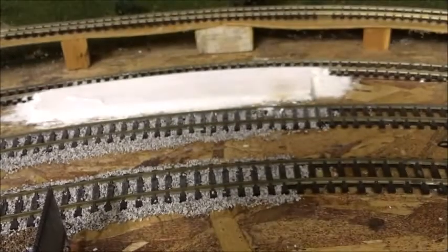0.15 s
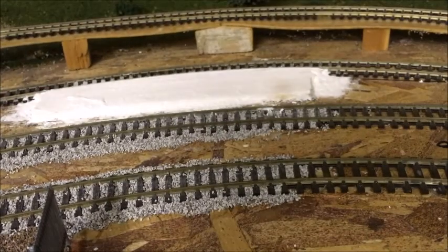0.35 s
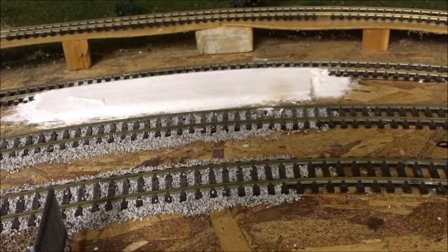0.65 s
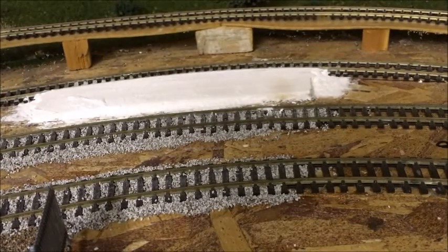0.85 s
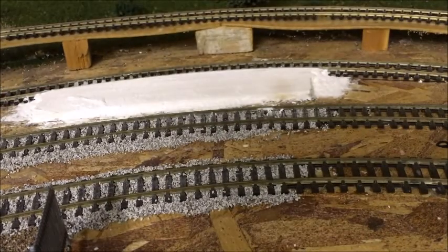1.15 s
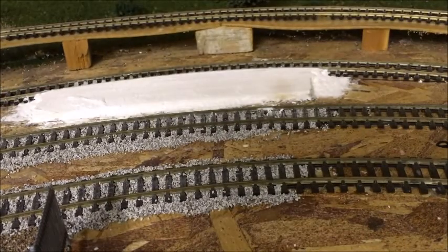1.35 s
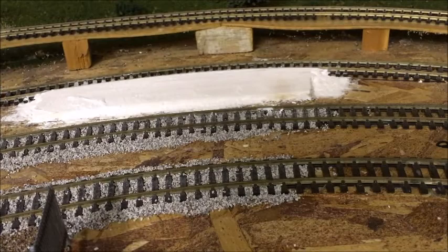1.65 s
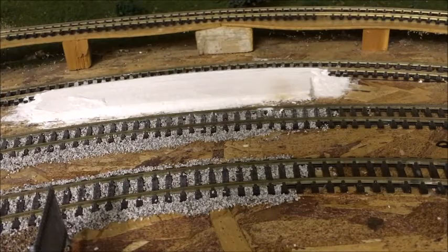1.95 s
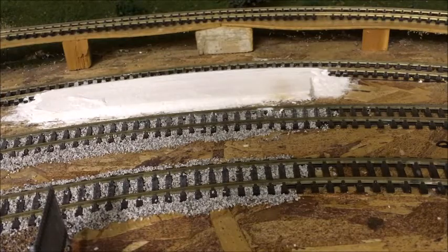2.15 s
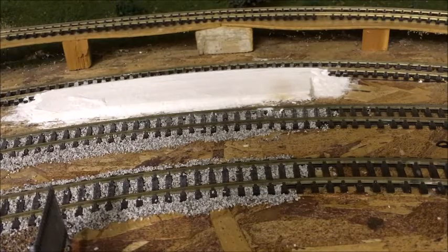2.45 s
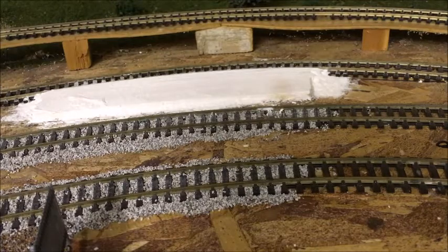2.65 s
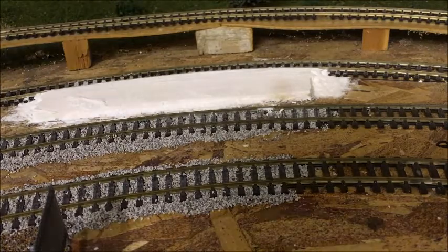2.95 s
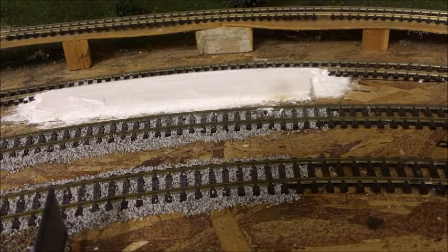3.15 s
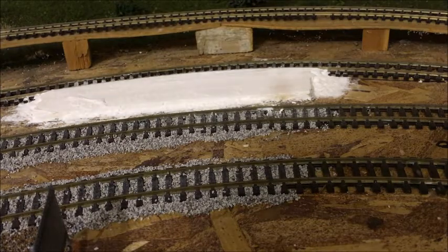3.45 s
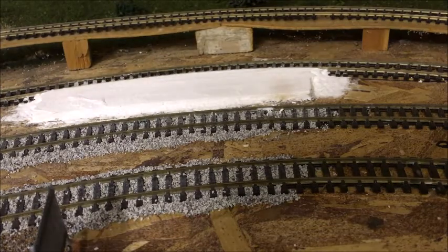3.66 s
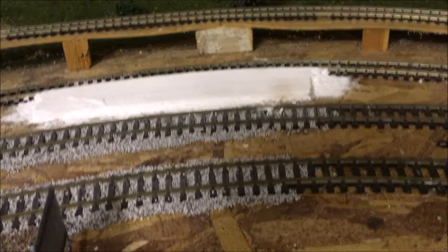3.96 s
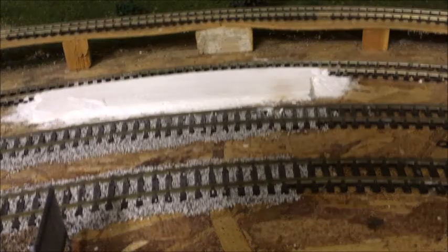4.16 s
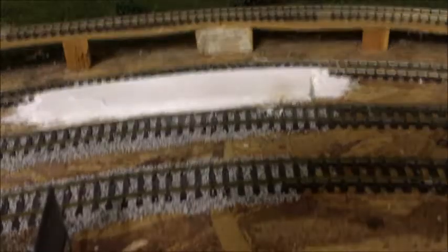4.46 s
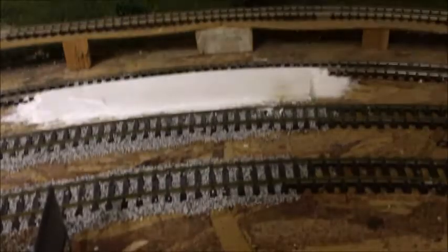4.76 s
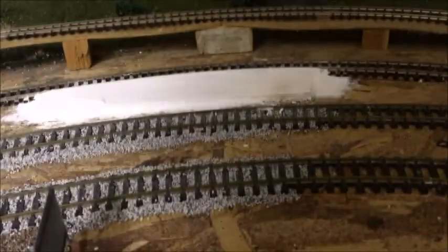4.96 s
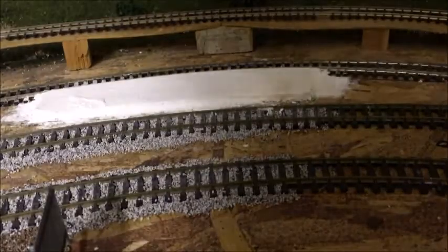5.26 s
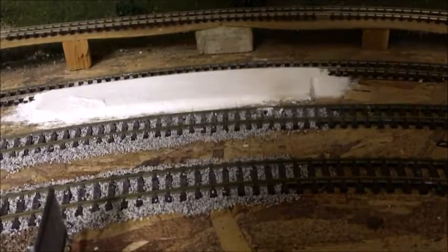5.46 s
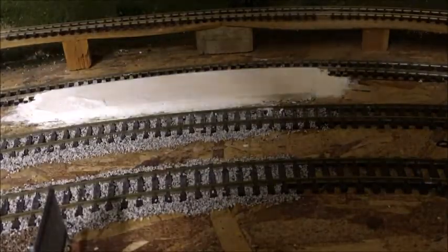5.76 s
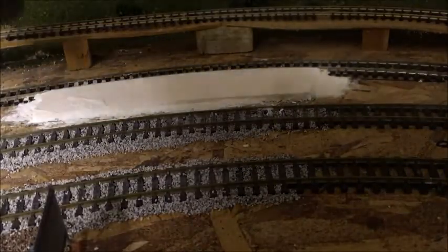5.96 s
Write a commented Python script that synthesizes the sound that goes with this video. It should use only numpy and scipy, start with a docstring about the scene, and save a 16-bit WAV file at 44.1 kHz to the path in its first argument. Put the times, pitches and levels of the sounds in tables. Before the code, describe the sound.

In a quiet indoor hobby room with a low hum, hands make soft papery scuffs, small rasps and dull thumps on a wooden table. After more than two seconds a switch clicks and a vacuum cleaner spins up quickly, its whine rising into a steady roar with bright hiss. Low jolts shake the table, which groans once, rising in pitch. The microphone is close, dry and centred.

```python
"""A hobby room with a wooden table: quiet handling, then a vacuum cleaner, both channels alike.
Grains of noise make the scuffs of paper and cloth; low noise and dying rings make the dull bumps.
The cleaner clicks on and spins up: tones locked to its shaft rise over a roar of shaped noise.
Once the table groans under the hose, as tones at a rising stick-slip rate.
Now and then the sound thins out for a moment, when only its strongest frequencies pass."""
import sys
import numpy as np
from scipy import signal
from scipy.fft import rfft, irfft
from scipy.io import wavfile
from scipy.ndimage import uniform_filter1d, map_coordinates

SR = 44100
rng = np.random.default_rng(int(sys.argv[2]) if len(sys.argv) > 2 else 0)


def unload_wav(signal):
    """Save mono or channel-first audio to the path in sys.argv[1] as 16-bit WAV at rate SR, clipped to [-1, 1]."""
    wavfile.write(
        sys.argv[1],
        SR,
        np.round(np.clip(np.atleast_2d(signal).T, -1, 1) * 32767).astype(np.int16),
    )


def amplitude_ratio(level_db):
    """Convert a level in decibels to the matching linear amplitude (field) ratio."""
    exponent = np.asarray(level_db, float) / 20
    return 10 ** exponent


N = 269892
T = np.arange(N) / SR
SWITCH_S = 2.41  # the cleaner is switched on


def unit(x):
    """Scales x to rms 1."""
    return x / np.sqrt(np.mean(x ** 2) + 1e-20)


def evened(x, size):
    """Brings x to rms 1 over a running stretch of samples."""
    return x / np.sqrt(np.abs(uniform_filter1d(x ** 2, size=size)) + 1e-20)


def along(points, hz):
    """Reads a (f/Hz, level/dB) table along a log frequency axis."""
    f, level = np.transpose(points)
    return np.interp(np.log(hz + 1), np.log(f + 1), level)


def curves(rows):
    """Gives one value per sample for each column after the time."""
    s, *columns = np.transpose(rows)
    return [np.interp(T, s, column) for column in columns]


def sounding(rows):
    """One while a table lasts, zero outside, with 10 ms edges."""
    return np.clip(np.minimum(T - rows[0][0], rows[-1][0] + .01 - T) / .01, 0, 1)


def wobble(rate):
    """A smooth random curve with rate random points a second."""
    return map_coordinates(rng.standard_normal(int(N * rate / SR) + 4), [T * rate])


def swell(s, db, width):
    """A bell-shaped rise and fall around the time s."""
    return amplitude_ratio(db) * np.exp(-.5 * ((T - s) / width) ** 2)


def grit(spread_db):
    """Dense grains of noise whose size varies at random."""
    return rng.standard_normal(N) * amplitude_ratio(spread_db * wobble(900))


def noise(gain, patchy_db, source=None, size=1024):
    """Noise with patches of random level, shaped by gain(Hz column, s row)."""
    source = rng.standard_normal(N) if source is None else source
    hz, s, z = signal.stft(source, SR, nperseg=size)
    field = uniform_filter1d(rng.standard_normal(z.shape), size=8, axis=0)
    field = uniform_filter1d(field, size=6, axis=1)
    shaped = z * amplitude_ratio(patchy_db * unit(field)) * gain(hz[:, None], s)
    return signal.istft(shaped, SR, nperseg=size)[1][:N]


def colored(points, patchy_db, source=None, size=1024):
    """Patchy noise with the fixed spectrum of a table."""
    return noise(lambda hz, s: amplitude_ratio(along(points, hz)), patchy_db, source, size)


def tone(hz):
    """A sine of rms 1 on a moving pitch: the phase adds up the frequency."""
    return np.sqrt(2) * np.sin(2 * np.pi * np.cumsum(hz * np.ones(N)) / SR + rng.uniform(0, 2 * np.pi))


# Spectrum of the steady floor: f/Hz, level/dB (relative)
FLOOR_SPECTRUM = [(15, -73), (25, -65), (43, -25), (59, 2.5), (80, -20), (113, -11), (148, -10.5),
                  (179, -14.5), (352, -28.5), (1640, -44), (2970, -64), (4950, -91), (15800, -38)]


def room():
    """The floor of the room and the microphone is steady, mostly low noise."""
    return amplitude_ratio(-54.5) * unit(colored(FLOOR_SPECTRUM, patchy_db=1.5, size=4096))


# What the heavy frame of the table passes on: f/Hz, level/dB (relative)
FRAME_SPECTRUM = [(20, -23), (35, 8), (50, -3), (85, 2.5), (115, 2), (160, -40.5)]
# What the lighter table top passes on: f/Hz, level/dB (relative)
TOP_SPECTRUM = [(90, -23), (130, 0.5), (185, 7.5), (230, -12), (310, -8), (400, -18), (600, -51)]
# How busy the hands are: t/s, frame level/dB, top level/dB
HAND_LEVELS = [(0, -52.5, -52), (.14, -46, -47.5), (.21, -38, -44.5), (.42, -50, -52), (.6, -52, -61),
               (.68, -47.5, -53), (.9, -57, -55.5), (1.04, -55, -68), (1.08, -50, -46), (1.36, -53, -51.5),
               (1.54, -54, -58), (1.69, -42.5, -48.5), (1.82, -57.5, -62), (2.1, -54.5, -54),
               (2.16, -55, -49.5), (2.41, -53, -54), (2.45, -47, -57)]
# Jolts of the table under the running motor: peak t/s, level/dB, width of the bell t/s
JOLTS = [(2.62, -51, .03), (2.78, -39, 0.055), (2.86, -48, .04), (3.89, -31, 0.022), (4.18, -40, 0.023),
         (4.28, -50, .04), (4.37, -30, 0.031), (4.92, -43, 0.053), (5.1, -39.5, 0.069), (5.28, -50, .1),
         (5.42, -41, 0.1), (5.79, -49, .04), (6.01, -47, 0.035)]


def bumps():
    """Hands and hose shake the frame and the top of the table, which pass on low lumps of noise."""
    frame = evened(colored(FRAME_SPECTRUM, patchy_db=-0.5, size=4096), size=3000)
    top = evened(colored(TOP_SPECTRUM, patchy_db=4.5, size=4096), size=2000)
    deep = noise(lambda hz, s: amplitude_ratio(along(FRAME_SPECTRUM, hz)) * (hz > 33), patchy_db=-1.5, size=4096)
    deep = evened(deep, size=4000)
    frame_db, top_db = curves(HAND_LEVELS)
    hands = amplitude_ratio(frame_db + 1.9 * wobble(13.84)) * frame
    hands += amplitude_ratio(top_db + 1.5 * wobble(14)) * top
    tremor = (T > SWITCH_S) * amplitude_ratio(-58 + 5.6 * wobble(6.8))  # unsteady shaking while the motor runs
    jolts = sum(swell(*row) for row in JOLTS)
    return sounding(HAND_LEVELS) * hands + (jolts + tremor) * deep


# Low thumps of a hand on the table: t/s, level/dB (before the soft onset), ring f/Hz, fall by 60 dB t/s
HAND_THUMPS = [(.19, -27, 80, 0.2), (0.241, -27.5, 75, 0.43), (1.075, -34, 87.4, 0.63),
               (1.595, -27, 229, 0.054), (1.674, -21.5, 172, 0.04), (2.132, -40.5, 190, 0.6)]


def thumps():
    """Each thump is one soft-edged ring that dies away exponentially."""
    out = np.zeros(N)
    for s, db, hz, t60 in HAND_THUMPS:
        t = np.clip(T - s, 0, None)
        onset = 1 - np.exp(-t / 0.0068)
        out += amplitude_ratio(db - 60 * t / t60) * np.sin(2 * np.pi * hz * t) * onset
    return out


# Strokes of paper and cloth: start t/s, length t/s, peak level/dB, sheen level/dB (relative to the rub)
RUB_STROKES = [(-.06, 0.3, -52.5, 1.5), (0.142, 0.22, -48.5, -7), (0.263, 0.13, -53.5, -9),
               (.34, 0.48, -64.5, -0.5), (0.606, 0.23, -58.5, -3.5), (0.78, 0.13, -55, -11),
               (.84, .2, -70, 0), (0.99, 0.083, -65, -20), (1.055, 0.082, -58.5, -14),
               (1.093, 0.25, -72.5, -13), (1.383, 0.11, -58.5, -1.5), (1.56, 0.089, -61, -23),
               (1.63, 0.14, -75, -1), (1.74, 0.091, -69, 8), (2.056, 0.094, -68.5, -19),
               (2.126, .26, -55.5, -7), (2.337, 0.24, -67, -3)]


def strokes():
    """Levels of the rub and its bright sheen: a stroke swells quickly and fades more slowly."""
    peak_at, sharpness = 0.41, 1.58  # share of the length before the peak; power of the sine swell
    rub = amplitude_ratio(-77.5 + 2.7 * wobble(5.86)) * (T < SWITCH_S)  # faint rustle between the strokes
    sheen = amplitude_ratio(-10) * rub
    for s, length, db, sheen_db in RUB_STROKES:
        progress = np.clip((T - s) / length, 0, 1) ** (np.log(.5) / np.log(peak_at))
        shape = amplitude_ratio(db) * np.abs(np.sin(np.pi * progress)) ** sharpness
        rub = rub + shape
        sheen = sheen + amplitude_ratio(sheen_db) * shape
    return rub, sheen


# Spectrum of the rubbing grains: f/Hz, level/dB (relative)
RUB_SPECTRUM = [(240, -3), (400, 1.5), (852, -5.5), (951, -2.5), (1630, -1.5), (1840, -6.5), (2580, -2),
                (4930, -15), (5500, -15), (7150, -29), (12100, -120)]
# Spectrum of the bright sheen on the strokes: f/Hz, level/dB (relative)
SHEEN_SPECTRUM = [(2650, -15), (4500, -1), (4990, -19), (5720, 2.5), (6210, -1), (7820, -6.5), (8890, -2.5),
                  (10400, -5.5), (15300, -2.5)]
# Resonances of the short knock: f/Hz, fall by 60 dB t/s, level/dB (relative)
KNOCK_RINGS = [(418, 0.15, -7.5), (1043, 0.15, -19), (250, 0.033, -11)]
# Short rasps, and last the click of the cleaner's switch:
# t/s, level/dB (scale), length t/s, knock level/dB and bright ping level/dB (both relative)
RASPS_AND_CLICK = [(0.289, -38, 0.012, 1, -30), (0.8197, -31, 0.012, -14.5, -5.5),
                   (1.404, -43, 0.025, 12, -30), (1.593, -67, 0.033, -3, -28), (2.416, -33, 0.039, 5, -35)]


def scuffing():
    """Strokes are rubbing grains; each rasp or click is a burst of grains with a short knock."""
    rub_gain, sheen_gain = strokes()
    rub = unit(colored(RUB_SPECTRUM, patchy_db=1.5, source=grit(spread_db=3.0)))
    sheen = unit(colored(SHEEN_SPECTRUM, patchy_db=1))
    out = rub_gain * rub + sheen_gain * sheen
    t = np.arange(SR // 5) / SR
    knock = sum(amplitude_ratio(db - 60 * t / t60) * np.sin(2 * np.pi * hz * t) for hz, t60, db in KNOCK_RINGS)
    flutter = 1 + 0.87 * np.sin(2 * np.pi * 170 * t)
    ping = amplitude_ratio(-60 * t / 0.036) * np.sin(2 * np.pi * 5270 * t) * flutter
    onset = 1 - np.exp(-t / 0.0032)
    for s, db, length, knock_db, ping_db in RASPS_AND_CLICK:
        u = np.clip(T - s, 0, None) / length
        out += amplitude_ratio(db) * rub * u * np.exp(-2 * u)
        ringing = amplitude_ratio(knock_db) * knock + amplitude_ratio(ping_db) * ping
        out[round(s * SR):][:len(t)] += amplitude_ratio(db) * ringing * onset
    return out


# Groan of the table: t/s, slip rate f/Hz, level/dB, octave level/dB
GROAN_PATH = [(4.22, 91.6, -62, -51), (4.26, 91.9, -19, -32), (4.3, 101.5, -30, -55),
              (4.37, 116.1, -26.5, -46), (4.42, 121.4, -30, -44), (4.49, 139.2, -20.5, -50),
              (4.56, 133.6, -25, -36), (4.6, 143.3, -39, -50), (4.67, 156, -39, -37), (4.75, 176, -58, -59)]


def groan():
    """Wood sticks and slips at a mostly rising, shaky rate; a panel of the table rings along."""
    rate_hz, level_db, octave_db = curves(GROAN_PATH)
    rate_hz = rate_hz + 3 * wobble(30)
    slips = amplitude_ratio(level_db + 1.3 * wobble(37)) * tone(rate_hz)
    slips += amplitude_ratio(octave_db) * tone(2 * rate_hz)
    panel = swell(4.52, -34 + 1.9 * wobble(30), 0.078) * tone(177 + 4 * wobble(13.0))
    return sounding(GROAN_PATH) * (slips + panel)


FULL_HZ = 417.9  # shaft at full speed, before it eases off


def spin_up():
    """The shaft gains speed with a quick kick, then approaches full speed exponentially."""
    kick_share, kick_s, slow_s = .16, .08, .295  # share of the quick gain; two time constants
    since = np.clip(T - SWITCH_S, 0, None)
    speed = 1 - kick_share * np.exp(-since / kick_s) - (1 - kick_share) * np.exp(-since / slow_s)
    sag_s = np.clip(T - 4.6, 0, None)
    shaft_hz = FULL_HZ * speed - 0.794 * sag_s  # late on, the pitch eases off a little
    lag = np.tanh(25 * np.clip(.993 - speed, 0, 1))  # near one while speed is gained, zero at the top
    opening = 1 - np.exp(-since / 0.0076)
    return since, speed, sag_s, shaft_hz, lag, opening


# How the room carries the shaft tone at each pitch: f/Hz, level/dB
SHAFT_CARRY = [(67, -62), (160, -49), (220, -31), (240, -40), (272, -26.5), (289, -42), (303, -33),
               (323, -44.5), (343, -32), (351, -42), (362, -32.5), (392, -28), (398, -29), (404, -27),
               (418, -25.5)]
# Shaft orders: multiple of the shaft, offset in hum multiples, full-speed level/dB,
# gain during the run-up level/dB, unsteadiness level/dB
SHAFT_ORDERS = [(2, 0, -45.5, -20, 1.5), (6, 0, -44, -6, 2.5), (12, 0, -51.5, 8.5, 2.5),
                (12, -2, -51, -25, 1.5)]
# Magnetic hum at twice the mains: t/s, level/dB
HUM_LEVELS = [(2.42, -56), (2.46, -31.5), (2.7, -33), (3.1, -37), (3.8, -42), (4.2, -37.5), (5, -42.5),
              (6.12, -39)]


def motor_tones():
    """The shaft sounds its turning rate and multiples of it; magnetic hum stays at one pitch."""
    hum_hz = 100
    whistle_hz, whistle_width_hz, whistle_db = 2430, 18, 10  # a cavity sings as an order sweeps through it
    since, speed, sag_s, shaft_hz, lag, opening = spin_up()
    shaft_db = along(SHAFT_CARRY, FULL_HZ * speed) - 1.4 * sag_s
    tones = amplitude_ratio(shaft_db + 0.56 * wobble(30)) * tone(shaft_hz + 1.11 * wobble(40))
    jitter_hz = (.25 + 9 * (1 - speed)) * wobble(90)
    for k, offset, db, early_db, shaky_db in SHAFT_ORDERS:
        sings_db = whistle_db * np.exp(-.5 * ((k * shaft_hz - whistle_hz) / whistle_width_hz) ** 2)
        level_db = db + early_db * lag + sings_db + shaky_db * wobble(18)
        tones += amplitude_ratio(level_db) * speed * tone(k * (shaft_hz + jitter_hz) + offset * hum_hz)
    tones += amplitude_ratio(curves(HUM_LEVELS)[0] + wobble(15)) * tone(hum_hz)
    return opening * tones


# Spectrum of the roaring air: f/Hz, level/dB (relative)
ROAR_SPECTRUM = [(280, -46), (480, -10), (559, -10.5), (652, -3.5), (816, -8.5), (885, -5.5), (1110, -1),
                 (1200, -11), (1370, -5), (1770, -3.5), (1920, -1), (2560, -4.5), (2640, -2.5),
                 (2890, -0.5), (5500, -12.5), (7150, -14.5), (12100, -120)]
# Spectrum of the brighter hiss: f/Hz, level/dB (relative)
HISS_SPECTRUM = [(2650, -16.5), (4500, -0.5), (5550, 2.5), (6030, 5.5), (6570, 3), (8150, -3.5), (9310, 1),
                 (11400, -6), (12600, -2.5), (15300, -4.5)]
# Spectrum of the rumble under the roar: f/Hz, level/dB (relative)
RUMBLE_SPECTRUM = [(100, -6.5), (150, -3), (250, -4), (350, -1.5), (470, 2.5), (560, -31)]
# Resonances of the cleaner's shell and hose: f/Hz, width f/Hz, level/dB (boost)
SHELL_RESONANCES = [(760, 36, 15), (1126, 40, 3), (1281, 270, 10.5), (1550, 23, 7.5), (2885, 27, 2.5),
                    (3337, 25, 17), (4320, 39, 12), (6340, 190, 2)]


def rushing_air():
    """Air roars and hisses through the shell and hose; the roar's upper edge climbs with the speed."""
    since, speed, sag_s, shaft_hz, lag, opening = spin_up()

    def shell(hz):
        return amplitude_ratio(sum(db / (1 + ((hz - c) / (w / 2)) ** 2) for c, w, db in SHELL_RESONANCES))

    def roar_shape(hz, s):
        shaft = np.interp(s, T, shaft_hz)
        distance = np.log((hz + 1) / (12 * shaft + 1)) / .09  # from the rate of 12 blades
        ridge = amplitude_ratio(6 * np.interp(s, T, lag) * np.exp(-.5 * distance ** 2))  # whoosh in the run-up
        edge_hz = 13 * shaft + 500
        return amplitude_ratio(along(ROAR_SPECTRUM, hz)) * shell(hz) * ridge / np.sqrt(1 + (hz / edge_hz) ** 8)

    def hiss_shape(hz, s):
        return amplitude_ratio(along(HISS_SPECTRUM, hz)) * shell(hz)

    roar = evened(noise(roar_shape, patchy_db=1.5, source=grit(spread_db=0.5)), size=8000)
    hiss = unit(noise(hiss_shape, patchy_db=0.5, source=grit(spread_db=-0.5)))
    rumble = unit(colored(RUMBLE_SPECTRUM, patchy_db=1.5, size=2048))
    roar_gain = amplitude_ratio(-28.5) * np.abs(speed) ** 1.49
    roar_gain += amplitude_ratio(-39) * opening * np.exp(-since / 0.1)  # first rush of air
    hiss_gain = amplitude_ratio(-33 + 0.25 * wobble(1.7)) * np.abs(speed) ** 2.28
    spit_s = 0.019  # short spit of hiss after the switch
    hiss_gain += amplitude_ratio(-38.5) * since / spit_s * np.exp(-since / spit_s)
    return roar_gain * (roar + amplitude_ratio(-12.5) * rumble) + hiss_gain * hiss


def vacuum():
    """The cleaner is its motor's tones together with the noise of the air it moves."""
    return motor_tones() + rushing_air()


def scene():
    """Adds all the sources and gives both channels the same sum."""
    mono = room() + bumps() + thumps() + scuffing() + groan() + vacuum()
    return np.array([mono, mono])


# Moments when the sound thins out: middle of the first block t/s, number of blocks
THIN_MOMENTS = [(.166, 1), (.487, 1), (.633, 1), (.679, 2), (.827, 1), (.871, 1), (1.107, 1), (1.659, 1),
                (1.851, 1), (1.915, 1), (2.705, 1), (3.112, 2), (3.238, 1), (3.301, 1), (3.345, 1),
                (3.473, 1), (3.537, 1), (3.814, 1), (3.986, 1), (4.217, 1), (4.666, 1), (4.712, 2),
                (4.815, 1), (4.859, 1), (5.753, 1), (5.818, 1), (5.861, 1), (5.924, 1)]


def thinned(x):
    """In 43 ms blocks the strongest frequencies above 500 Hz take over their neighbours' energy."""
    half = 941  # samples in half a block
    bar_db, leak_db = 5, -16  # bar over the local level at 6 kHz; what a single block still lets through
    fade = np.sin(np.pi * (np.arange(2 * half) + .5) / (2 * half))
    hz = np.fft.rfftfreq(2 * half, 1 / SR)
    out = x.copy()
    for s, blocks in THIN_MOMENTS:
        leak = amplitude_ratio(leak_db * blocks ** 2)
        for start in round(s * SR) + half * np.arange(-1, round(blocks) - 1):
            z = rfft(fade * x[start:start + 2 * half])
            power = np.abs(z) ** 2 + 1e-20
            local = np.abs(uniform_filter1d(power, size=25))
            passes = power > local * amplitude_ratio(2 * bar_db * (hz / 6000) ** .55)  # the bar rises with frequency
            passed = np.abs(uniform_filter1d(power * passes, size=25)) + 1e-20
            boost = np.minimum(np.sqrt(local / passed), amplitude_ratio(13))
            change = np.where(hz > 500, passes * boost + ~passes * leak - 1, 0)
            out[start:start + 2 * half] += fade * irfft(z * change)
    return out


def band_limit(x):
    """A steep low-pass at the top of the band."""
    return signal.sosfilt(signal.butter(12, 16930, fs=SR, output="sos"), x)


def record(dry):
    """Thins the sound at its moments and cuts everything from 15.8 kHz up."""
    spectrum = rfft(thinned(dry[0]))
    narrow = irfft(spectrum * (np.fft.rfftfreq(N, 1 / SR) < 15800), N)
    return band_limit(np.array([narrow, narrow]))


dry = scene()
out = record(dry)
unload_wav(out)
```